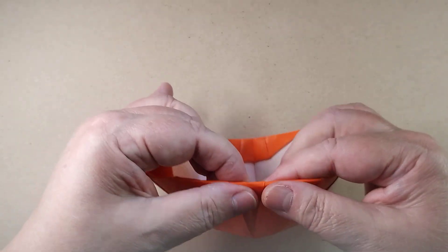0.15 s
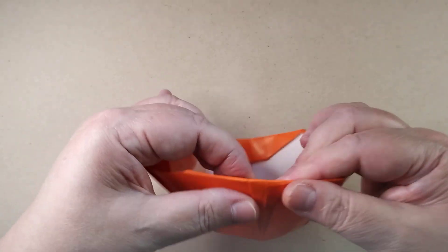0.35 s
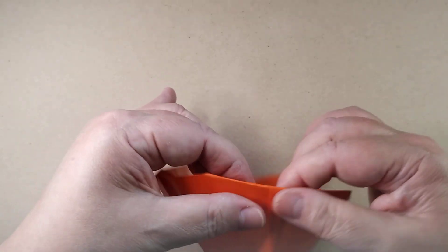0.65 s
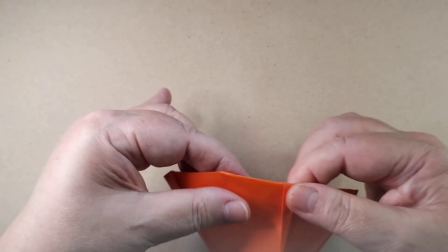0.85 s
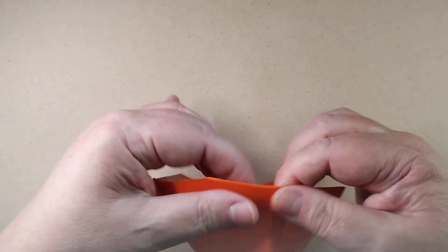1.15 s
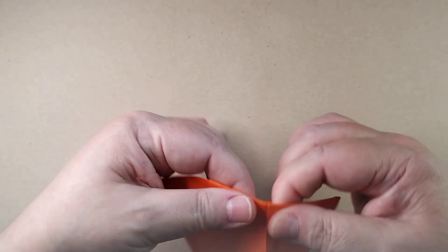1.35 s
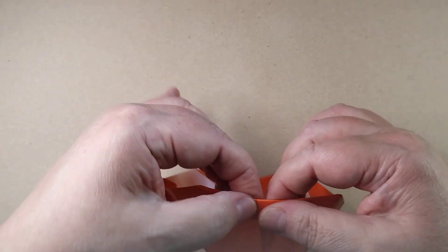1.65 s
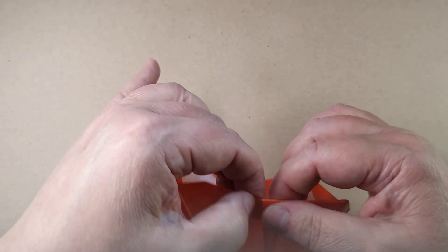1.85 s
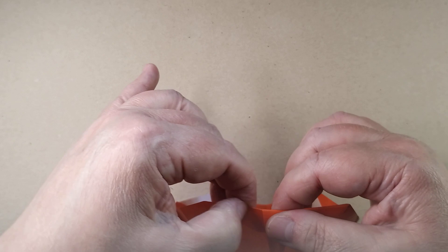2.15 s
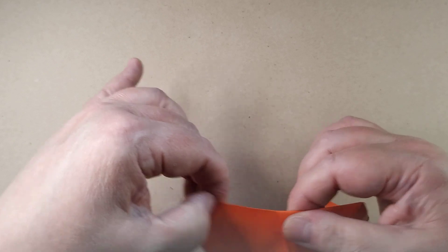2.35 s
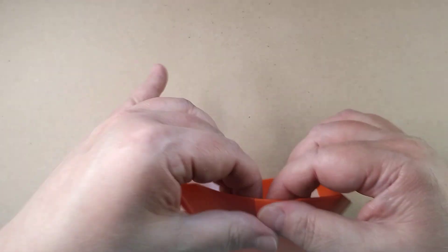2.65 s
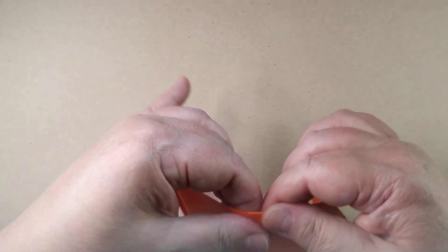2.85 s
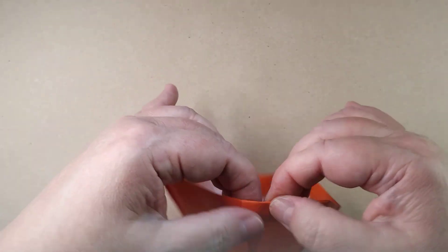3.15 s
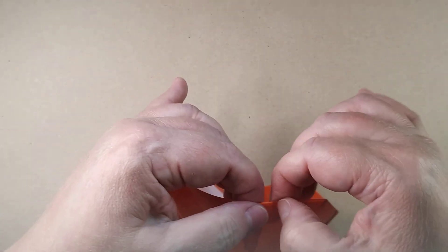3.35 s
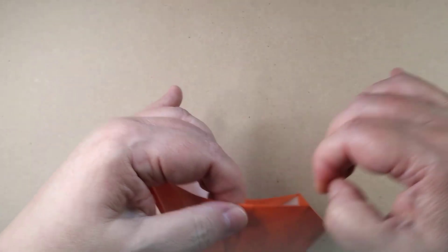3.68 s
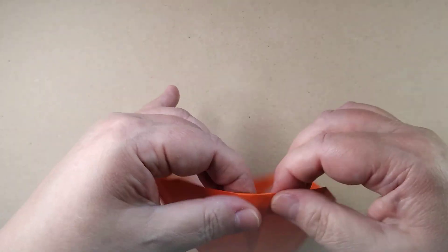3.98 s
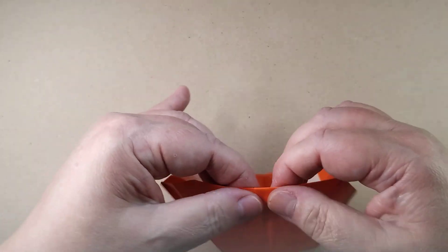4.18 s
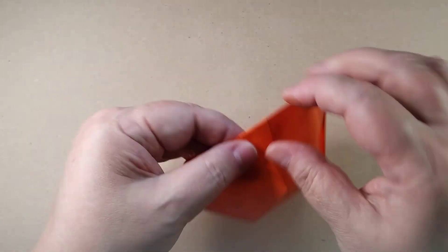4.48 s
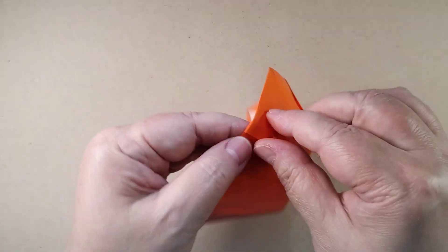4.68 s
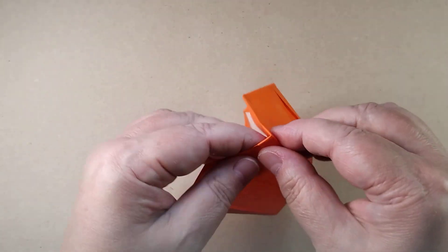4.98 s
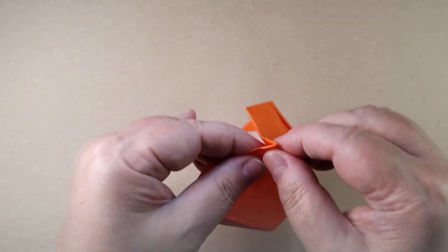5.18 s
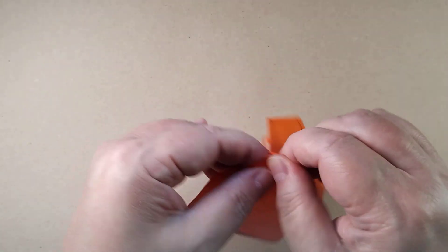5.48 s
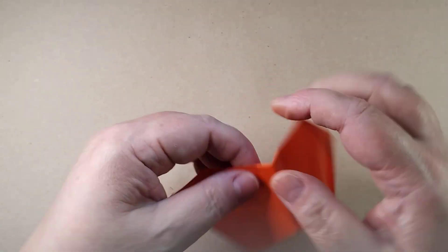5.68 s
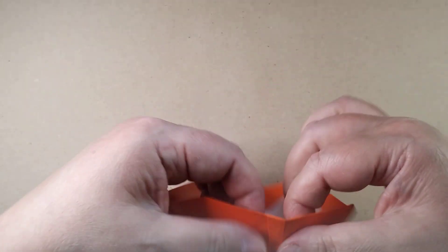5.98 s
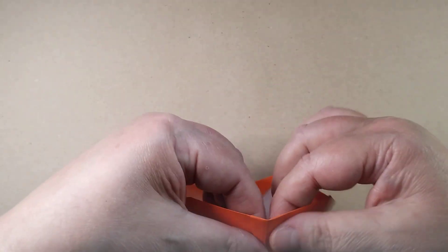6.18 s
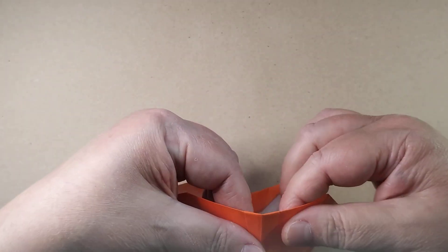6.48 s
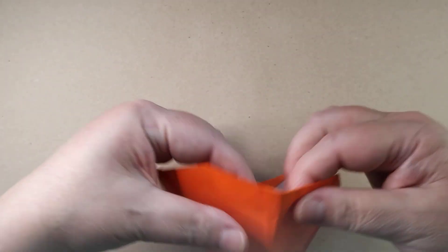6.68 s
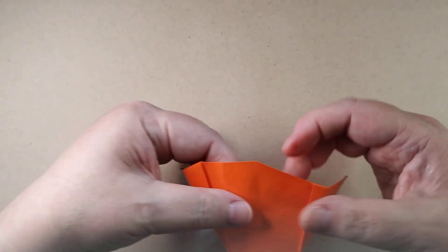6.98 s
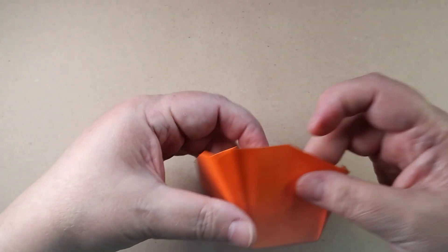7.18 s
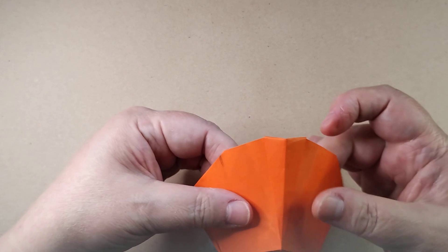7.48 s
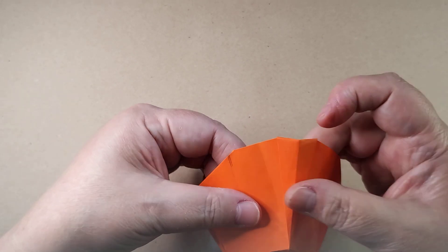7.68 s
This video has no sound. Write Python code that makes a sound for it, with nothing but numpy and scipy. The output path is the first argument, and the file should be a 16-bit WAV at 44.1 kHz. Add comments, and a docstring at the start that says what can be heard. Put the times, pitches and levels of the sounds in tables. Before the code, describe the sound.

Two hands fold a small paper model close to a stereo microphone in a quiet room. Creases give way in short, crisp, irregular snaps, while fingers slide over the sheet with a grainy hiss, faint ticks and a few soft hollow bumps. A brief, brighter swish comes early on, and the sharpest crackles arrive near the end, over faint room air and a low hum.

```python
"""A quiet room: two hands fold a small paper model close to a stereo camera microphone.
Creases buckle with short snaps that ring the stiff flaps, each trailed by a faint wash of hiss.
Fingers slide on the paper with a grainy stick-slip hiss and faint ticks; low hollow bumps come between.
The room answers briefly, over still air and a low hum."""
import sys
import numpy as np
from scipy import signal
from scipy.fft import rfft, irfft, next_fast_len
from scipy.io import wavfile
from scipy.ndimage import map_coordinates

SR = 44100
rng = np.random.default_rng(int(sys.argv[2]) if len(sys.argv) > 2 else 0)


def generate_wav(sig):
    """Save sig (samples, or channels by samples) to the path in sys.argv[1] as 16-bit PCM at SR."""
    pcm = np.round(np.clip(np.atleast_2d(sig).T, -1, 1) * 32767).astype(np.int16)
    wavfile.write(sys.argv[1], SR, pcm)


N = 345303
TOP_HZ = 16000


def amp(db):
    """Decibels to gain."""
    return 10 ** (np.asarray(db) / 20)


def unit(x):
    """Scale to rms 1."""
    return x / np.sqrt(np.mean(x ** 2) + 1e-20)


def along(points, hz):
    """Interpolate (freq_hz, value) points on a log axis."""
    freqs_hz, values = np.transpose(points)
    return np.interp(np.log(hz + 1), np.log(freqs_hz), values)


def wobble(rate_hz):
    """Smooth random curve, rate_hz knots a second."""
    knots = rng.standard_normal(int(N * rate_hz / SR) + 4)
    return map_coordinates(knots, [np.arange(N) * rate_hz / SR])


def filtered(x, response):
    """Apply a complex frequency response."""
    n = x.shape[-1]
    padded = next_fast_len(n + min(n, SR // 2), real=True)
    return irfft(rfft(x, padded) * response(np.fft.rfftfreq(padded, 1 / SR)), padded)[..., :n]


def coloured(x, spectrum):
    """Apply a (freq_hz, gain_db) curve."""
    return filtered(x, lambda hz: amp(along(spectrum, hz)))


def band(x, low_hz, high_hz, order):
    """Causal band-pass."""
    edges_hz = np.clip([low_hz, high_hz], 20, SR / 2 - 100)
    return signal.sosfilt(signal.butter(order, edges_hz, "bandpass", fs=SR, output="sos"), x)


# Left-right likeness: freq_hz, coherence
PORT_COHERENCE = [(100, 0.87), (300, 0.85), (550, 0.69), (1200, 0.38), (3000, 0.68), (8000, 0.16),
                  (15000, 1)]

def ports(pair, lag_s):
    """Two unrelated signals become partly alike at the microphone ports; the left lags."""
    angle = lambda hz: np.arccos(np.clip(along(PORT_COHERENCE, hz), 0, 1)) / 2
    mid, side = filtered(pair, lambda hz: np.array([np.cos(angle(hz)), np.sin(angle(hz))]))
    left = filtered(mid + side, lambda hz: np.exp(-2j * np.pi * hz * lag_s))
    return np.array([left, mid - side])


# Still air and microphone hiss: freq_hz, gain_db
AIR_SPECTRUM = [(20, -23.5), (60, -13), (125, -6), (180, -12.5), (420, -18), (700, -19), (1500, -24),
                (2150, -23.5), (3200, -27.5), (9000, -27.5), (16000, -36.5)]

def air_and_hum(air_db=-66, hum_db=-72, hum_hz=126, start_db=-9, swell_s=1.43):
    """Room air and a wavering low hum, both swelling in."""
    t = np.arange(N) / SR
    air = unit(coloured(ports(rng.standard_normal((2, N)), lag_s=0), AIR_SPECTRUM))
    hum = unit(np.sin(2 * np.pi * hum_hz * t + 0.47 * wobble(24)) * amp(0.7 * wobble(26)))
    swell = amp(start_db * np.maximum(1 - t / swell_s, 0))
    return (amp(air_db) * air + amp(hum_db) * hum) * swell


def buckle(t, lag_s, run_s, t60_s, kick):
    """A crease gives way with a kick, runs on briefly and dies away."""
    envelope = amp(-60 * np.maximum(t - run_s, 0) / t60_s) * (1 + kick * np.exp(-t / 0.00048))
    return ports(rng.standard_normal((2, len(t))) * envelope, lag_s)


# Resonances of the folded shape: centre_hz, width_hz, gain_db
SHAPE_MODES = [(461, 18.7, 9), (1132, 226, 7), (2144, 88, 13)]

def folded_shape(hz):
    """Response of the folded shape: direct path plus resonances."""
    return 1 + sum(amp(db) * 1j * hz * width_hz / (centre_hz ** 2 - hz ** 2 + 1j * hz * width_hz)
                   for centre_hz, width_hz, db in SHAPE_MODES)


def mode(t, pitch_hz, t60_s):
    """One resonance swings up within a cycle and decays, its pitch unsteady."""
    drift_rad = np.cumsum(rng.standard_normal(len(t))) * 9 / np.sqrt(SR)
    envelope = amp(-60 * t / t60_s) * (1 - np.exp(-2 * pitch_hz * t))
    return np.sin(2 * np.pi * pitch_hz * t + drift_rad) * envelope


# Sheet thud under a crease of typical strength: time_s, level_db
THUD_LEVELS = [(.2, -57), (1.2, -45), (2, -50), (3.3, -42.5), (5.2, -49), (6.3, -43), (7.5, -42)]
# Buckling creases: start_s, flap_hz, strength_db, sharpness_db (fibre fizz over flap ring)
CREASE_SNAPS = [(0.151, 2145, -40, -18), (0.2062, 3560, -40.5, 5), (0.2821, 2220, -37.5, -9),
                (0.347, 1000, -54.5, -31), (.4403, 2120, -51, -9), (0.571, 1130, -57, -18),
                (.593, 1690, -57, 6.5), (0.7367, 2270, -45.5, -20), (0.8671, 1610, -53, -15),
                (.969, 1070, -56, -33), (1.0344, 1030, -48.5, -24), (1.059, 1020, -42.5, 1.5),
                (1.2249, 2095, -44, -4.5), (1.3178, 2110, -39, -10.5), (1.515, 1132, -27, -19.5),
                (1.5377, 840, -46.5, -9), (1.572, 2120, -29, -16.5), (1.605, 1230, -42.5, -6),
                (1.622, 1890, -36.5, -7), (1.6358, 1130, -41.5, -12), (1.941, 2050, -33, -38),
                (2.2426, 1300, -46.5, -5), (2.3038, 2430, -38.5, -3), (2.317, 2320, -37, -9),
                (2.3512, 1690, -29, -11.5), (2.3914, 1990, -37, 3), (2.4055, 2080, -39, -5),
                (2.5255, 2510, -32, -17), (2.777, 1310, -63.5, -23), (2.8498, 2300, -42, -2.5),
                (2.8674, 2810, -32, 2), (3.1316, 1960, -43.5, 7.5), (3.148, 2150, -47.5, 3),
                (3.2011, 1267, -30.5, -22.5), (3.251, 2180, -35.5, -9), (3.6542, 1020, -40.5, -0.5),
                (3.6688, 1040, -40, 0.5), (3.7602, 2690, -40.5, 4), (3.801, 1170, -34, -9),
                (4.0782, 1950, -50.5, -4.5), (4.322, 2180, -46.5, -3), (4.525, 2150, -57, 4),
                (4.5548, 2140, -36.5, -1), (4.7591, 1220, -46, -7), (4.902, 2120, -41, -28),
                (4.991, 1110, -57.5, -20), (5.035, 1310, -61, -8), (5.1755, 1060, -43, 16),
                (5.2143, 1210, -35.5, -25), (5.4428, 2080, -33, -19.5), (5.7061, 1040, -51, -14),
                (5.741, 2135, -37.5, -8.5), (5.792, 2720, -49, 10.5), (6.0612, 855, -46.5, -4),
                (6.111, 2120, -23.5, -5.5), (6.1393, 2225, -22.5, -4.5), (6.2735, 2580, -45, -0.5),
                (6.2897, 1138, -35, -15), (6.3004, 1200, -38, -11), (6.4028, 1356, -27.5, -14),
                (6.784, 1050, -38.5, -24), (6.9557, 1210, -57, 0), (7.097, 1260, -67, -4.5),
                (7.2132, 2494, -22, -3.5), (7.2329, 1150, -33.5, -34), (7.4408, 1248, -31, -15.5),
                (7.5738, 2090, -41, -20)]

def snaps(tone_gain=0.76, clack_ratio=1.836, typical_db=-40, size=2048):
    """Each buckle thuds the sheet, rings a flap, cracks and fizzes along the fibres."""
    out, t = np.zeros((2, N + size)), np.arange(size) / SR
    level = lambda x, db: amp(db) * unit(x) * np.sqrt(0.01 * SR / size)  # energy of 10 ms at db
    for start_s, flap_hz, strength_db, sharpness_db in CREASE_SNAPS:
        lag_s = rng.uniform(2e-5, 9.3e-5)  # each crease has its own angle to the ports
        thud = buckle(t, lag_s, run_s=0.002, t60_s=0.042, kick=0.23)
        thud = band(filtered(thud, folded_shape), 235, 850, order=3)
        grip_detune = 1 + 0.012 * rng.standard_normal()
        clack = buckle(t, lag_s, run_s=0.0027, t60_s=0.021, kick=0.82)
        clack = filtered(clack, lambda hz: folded_shape(hz * grip_detune))
        centre_hz = np.sqrt(flap_hz * 1500)  # a large, low flap darkens the clack
        clack = band(clack, centre_hz / clack_ratio, centre_hz * clack_ratio, order=3)
        ring = unit(clack) + tone_gain * unit(mode(t, flap_hz, t60_s=0.019))
        crack = band(buckle(t, lag_s, run_s=0.0014, t60_s=0.037, kick=0.42), 2300, 7270, order=3)
        fizz = buckle(t, lag_s, run_s=0.0017, t60_s=0.031, kick=1.9)
        fizz = band(band(fizz, 7170, TOP_HZ, order=3), 2300, 10400, order=2)
        thud_db = np.interp(start_s, *np.transpose(THUD_LEVELS)) + 0.59 * (strength_db - typical_db)
        crack_db = strength_db + 0.5 + 0.64 * sharpness_db
        snap = (level(thud, thud_db) + level(ring, strength_db)
                + level(crack, crack_db) + level(fizz, strength_db + sharpness_db))
        out[:, round(start_s * SR):][:, :size] += snap
    return out[:, :N]


def friction(rate_hz, spread_db, smooth_power):
    """Stick-slip: tiny unequal catches over smooth sliding, under uneven finger pressure."""
    catches = (rng.random(N) < rate_hz / SR) * amp(spread_db * np.minimum(rng.exponential(size=N), 4))
    power = signal.lfilter([1], [1, -np.exp(-1 / (0.0018 * SR))], catches ** 2)
    pressure = amp(3.4 * wobble(55) + 1.8 * wobble(22))
    grain = np.sqrt(power / power.mean() + smooth_power) * pressure
    return ports(grain * rng.standard_normal((2, N)), lag_s=8e-5)


# Bending sheet: freq_hz, gain_db
RUSTLE_SPECTRUM = [(20, -62), (80, -26), (250, -3.5), (440, 3), (830, -4.5), (1200, 0.5), (1850, -6.5),
                   (2150, -2), (2700, -0.5), (3300, -24), (6000, -14.5)]
# Paper sliding on skin and paper: freq_hz, gain_db
HISS_SPECTRUM = [(1500, -18), (3200, -4), (4200, 3.5), (5200, -5), (7500, 0), (12000, -7), (16000, -11)]
# Finger strokes: start_s, end_s, hiss_db, rustle_over_hiss_db
FINGER_STROKES = [(.44, 0.598, -60.5, -8.5), (0.524, 0.559, -50.5, -6.5), (0.68, 0.719, -62, -5),
                  (0.734, 0.966, -64, -16), (1.084, 1.29, -83, -3), (1.149, 1.2, -55.5, 3.5),
                  (1.216, 1.262, -43.5, -11), (1.388, 1.438, -56.5, -4.5), (1.484, 1.678, -59, 6),
                  (1.667, 1.89, -57, -11.5), (1.735, 1.79, -53.5, -6.5), (1.991, 2.042, -62.5, 7),
                  (2.18, 2.26, -59, 4), (2.225, 2.31, -56, 6), (2.296, 2.392, -41, 2.5),
                  (2.405, 2.566, -40.5, 2), (2.495, 2.537, -26, -30), (2.793, 2.91, -66.5, 6.5),
                  (3.086, 3.17, -78, 15), (3.19, 3.297, -55.5, 3.5), (3.323, 3.378, -60, -2.5),
                  (3.419, 3.68, -61, 1), (3.646, 3.773, -63.5, 13.5), (3.779, 3.822, -47, 7),
                  (4.129, 4.234, -52, -7.5), (4.247, 4.301, -48, -5.5), (4.394, 4.494, -56, -2.5),
                  (4.743, 4.807, -47, -4), (4.786, 4.906, -58.5, -3), (4.927, 4.987, -55.5, -4),
                  (5.056, 5.178, -53.5, -9.5), (5.192, 5.243, -47.5, -5), (5.333, 5.39, -49.5, -7),
                  (5.621, 5.701, -62, 2), (5.78, 5.828, -43, -4.5), (5.856, 5.95, -61, -3),
                  (5.977, 6.135, -56.5, -0.5), (6.264, 6.341, -44, -6), (6.527, 6.615, -58, -3.5),
                  (6.726, 6.8, -56, -1.5), (6.862, 6.925, -50.5, -4.5), (6.948, 6.983, -53.5, 8),
                  (7.181, 7.323, -52, -6), (7.547, 7.623, -50, -18), (7.645, 7.848, -63.5, -7)]

def sliding(after_snap_s=0.073, attack_s=0.011, release_s=0.026, arch_db=4, split_hz=4800):
    """Stroked paper hisses and rustles; a short, faint wash of both also follows each snap."""
    strokes = [(start_s, end_s, hiss_db + over_db, hiss_db)
               for start_s, end_s, hiss_db, over_db in FINGER_STROKES]
    after_snap_hiss = [
        (start_s, start_s + after_snap_s, strength_db - 26.5, strength_db - 27 + 0.93 * sharpness_db)
        for start_s, _, strength_db, sharpness_db in CREASE_SNAPS]
    t, powers = np.arange(N) / SR, np.zeros((3, N))
    for start_s, end_s, rustle_db, hiss_db in strokes + after_snap_hiss:
        during = slice(*np.searchsorted(t, [start_s, end_s]))
        age_s, length_s = t[during] - start_s, end_s - start_s
        fade = np.clip(np.minimum(age_s / attack_s, (length_s - age_s) / release_s), 0, 1)
        swell_db = arch_db * (np.sin(np.pi * age_s / length_s) - 2 / np.pi)
        low_hiss_db = hiss_db + 0.52 * (rustle_db - hiss_db) - 0.55  # a light glide is brighter
        powers[:, during] += fade * amp(np.vstack([rustle_db, low_hiss_db, hiss_db]) + swell_db) ** 2
    rustle = unit(coloured(friction(rate_hz=900, spread_db=6.5, smooth_power=4.16), RUSTLE_SPECTRUM))
    hiss = unit(coloured(friction(rate_hz=320, spread_db=1.5, smooth_power=1.5), HISS_SPECTRUM))
    low_hiss = filtered(hiss, lambda hz: 1 / (1 + (hz / split_hz) ** 4))
    roll_db = 3 * wobble(rate_hz=16)  # rolling fingers shift the low-high balance
    layers = [rustle, low_hiss * amp(-roll_db), (hiss - low_hiss) * amp(roll_db)]
    return sum(np.sqrt(power) * layer for power, layer in zip(powers, layers))


# Room colour: freq_hz, gain_db
ROOM_SPECTRUM = [(100, 8), (440, 5), (700, 0.5), (2200, -4.5), (3300, -1), (15000, -0.5)]
# Room decay: freq_hz, t60_s
ROOM_DECAY = [(200, 0.26), (4000, 0.29), (14000, 0.22)]

def room(x, first_echo_s=0.0024):
    """Small-room reverberation; each frequency decays at its own rate."""
    noise = ports(rng.standard_normal((2, SR // 2)), lag_s=0)
    hz, t, frames = signal.stft(noise, SR, nperseg=256)
    decay = amp(-60 * t / along(ROOM_DECAY, hz)[:, None])
    _, tail = signal.istft(frames * decay, SR, nperseg=256)
    tail = coloured(tail / np.linalg.norm(tail[0]), ROOM_SPECTRUM)
    tail = np.pad(tail, ((0, 0), (round(first_echo_s * SR), 0)))
    return signal.fftconvolve(x, tail, axes=1)[:, :N]


def ticks(mean_gap_s=0.058, spread_db=4.0, max_per_stroke=10, size=1024):
    """Strained paper gives way in small ticks during a stroke, louder under a harder one."""
    out, t = np.zeros((2, N + size)), np.arange(size) / SR
    for start_s, end_s, hiss_db, rustle_over_hiss_db in FINGER_STROKES:
        gaps, pitches, strengths = rng.random((3, max_per_stroke))
        onsets_s = start_s + np.cumsum(2 * mean_gap_s * gaps)
        for onset_s, pitch, strength in zip(onsets_s, pitches, strengths):
            burst = buckle(t, lag_s=7e-5, run_s=0.00078, t60_s=0.044, kick=0.89)
            if onset_s < min(end_s, N / SR):
                pitch_hz = 900 * 6 ** pitch
                tick = band(burst, pitch_hz / 2, pitch_hz * 2, order=2)
                tick /= tick[:, :size // 8].std()
                level_db = hiss_db + rustle_over_hiss_db / 2 + spread_db * (2 * strength - 1)
                out[:, round(onset_s * SR):][:, :size] += amp(level_db) * tick
    return out[:, :N]


# Short pitched rings: start_s, pitch_hz, level_db, t60_s
BUMPS_AND_RINGS = [(0.968, 436, -56.5, 0.15), (1.243, 390, -23.5, 0.017), (2.527, 431, -34.5, 0.083),
                   (2.556, 399.6, -35, 0.11), (3.801, 422, -33, 0.11), (3.826, 406, -32, 0.032),
                   (4.681, 122, -56, 0.71), (4.799, 467, -36, 0.055), (4.989, 366, -38, 0.032),
                   (5.799, 256, -34.5, 0.045), (6.405, 1544, -36.5, 0.14), (7.574, 438, -34.5, 0.08)]

def bumps_and_rings(flutter_gain=0.25, size=8192):
    """Decaying tones with a noisy flutter: low hollow bumps, and one higher flap ring after a snap."""
    out, t = np.zeros(N + size), np.arange(size) / SR
    for start_s, pitch_hz, level_db, t60_s in BUMPS_AND_RINGS:
        noise = unit(band(rng.standard_normal(size), pitch_hz / 2.44, pitch_hz * 1.93, order=2))
        flutter = flutter_gain * noise * amp(-60 * t / t60_s)
        ring = band(mode(t, pitch_hz, t60_s) + flutter, pitch_hz / 2, pitch_hz * 2, order=2)
        out[round(start_s * SR):][:size] += amp(level_db) * ring
    return out[:N]


def scene(room_db=-12):
    """Paper and its reverberation lean right, most in the treble, over air and hum."""
    paper = snaps() + bumps_and_rings() + sliding() + ticks()
    lean_right = lambda hz: amp(np.outer([-1, 1], along([(2000, 0.5), (8000, 1.0)], hz)))
    return filtered(paper + amp(room_db) * room(paper), lean_right) + air_and_hum()


def record(dry):
    """The camera's band limit: a steep low-pass."""
    return filtered(dry, lambda hz: 1 / (1 + (hz / TOP_HZ) ** 120))


dry = scene()
out = record(dry)
generate_wav(out)
```